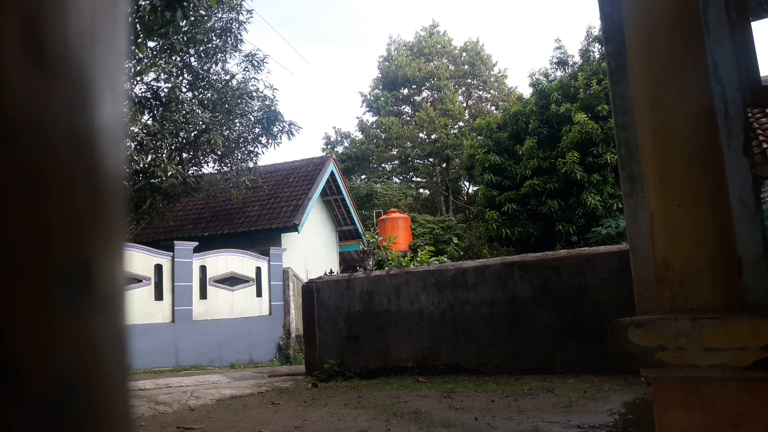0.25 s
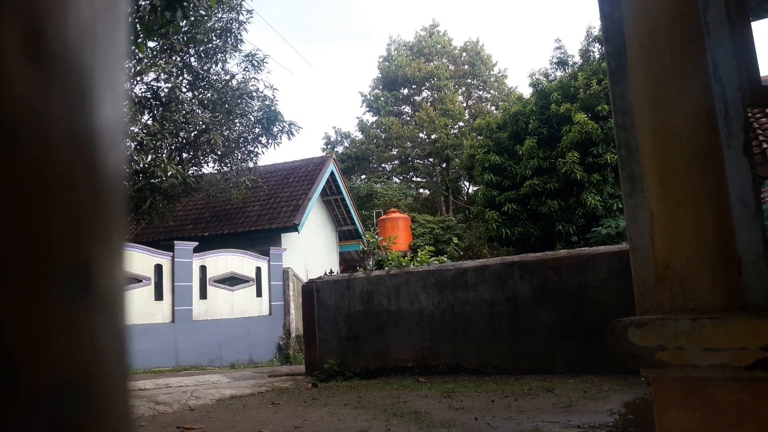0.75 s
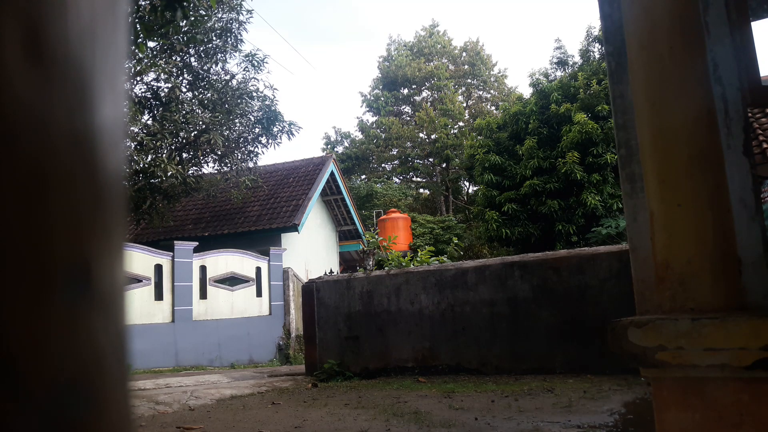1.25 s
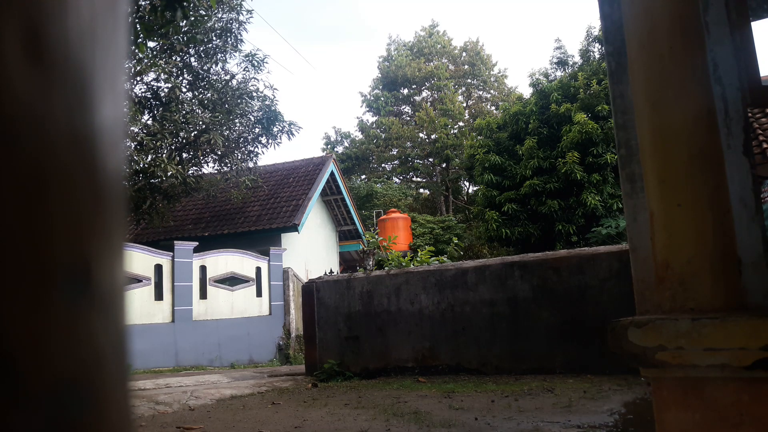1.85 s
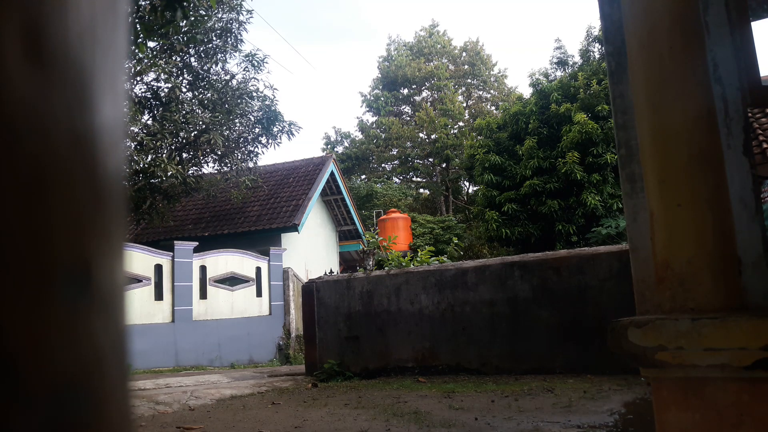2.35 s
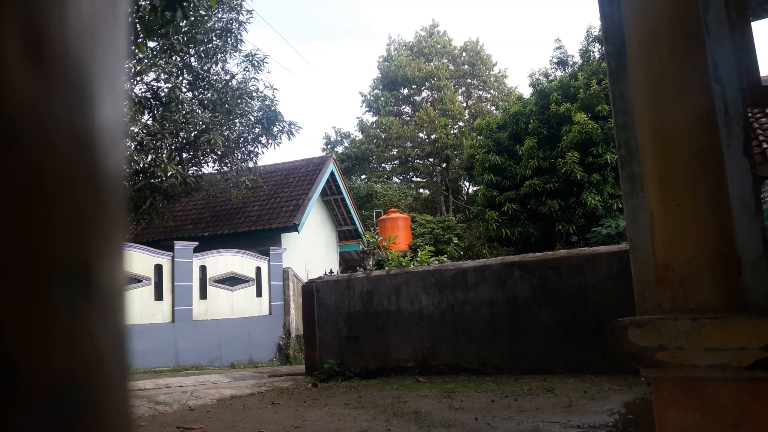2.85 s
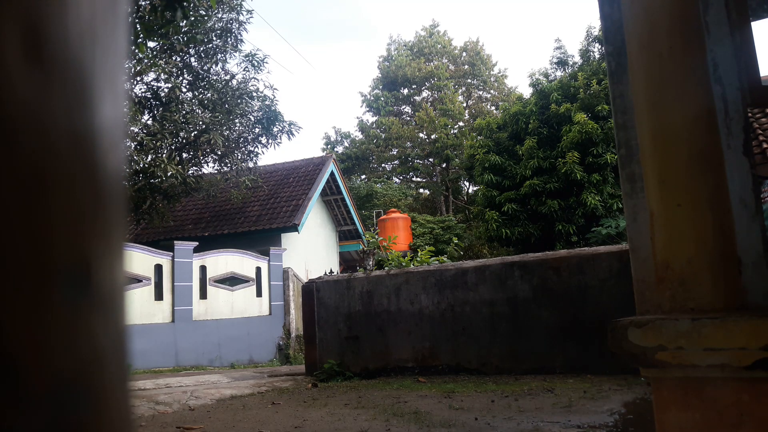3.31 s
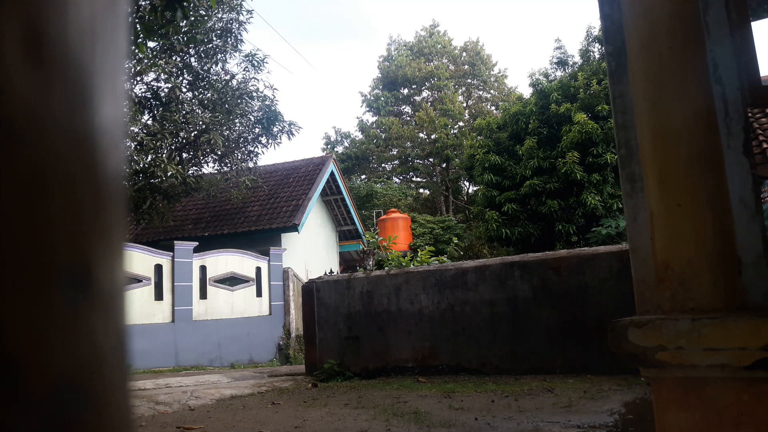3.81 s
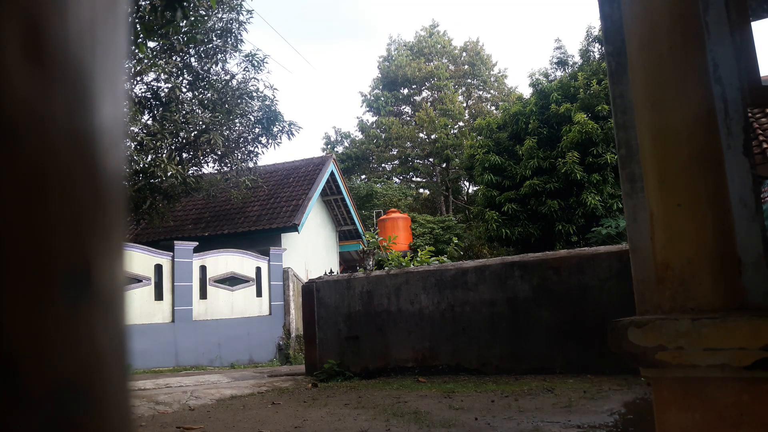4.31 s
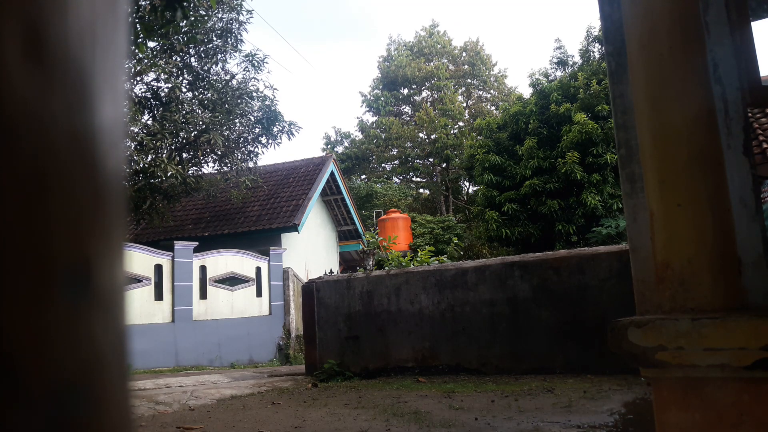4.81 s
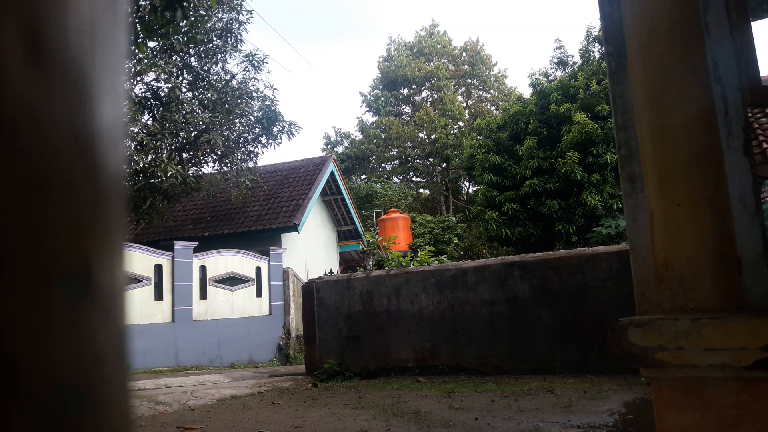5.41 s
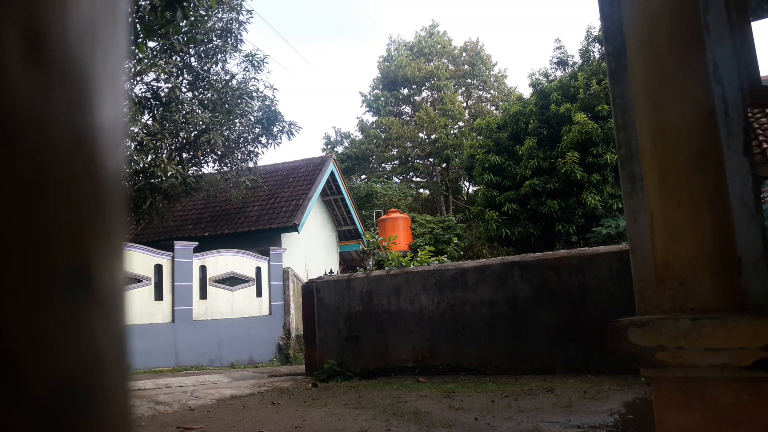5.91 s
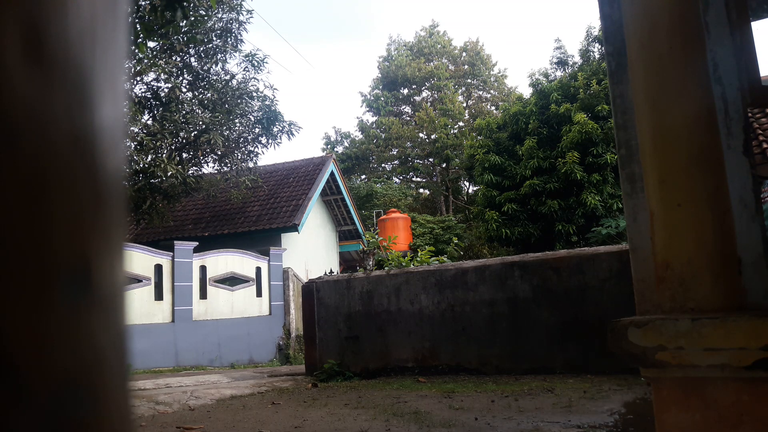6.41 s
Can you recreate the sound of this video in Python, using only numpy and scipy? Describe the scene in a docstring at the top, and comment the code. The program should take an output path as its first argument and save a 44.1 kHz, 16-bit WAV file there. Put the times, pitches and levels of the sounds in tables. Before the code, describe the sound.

Close thunder heard from a porch facing a walled yard. It starts abruptly on a heavy boom, dips, then a louder crack with a brief tearing edge hits at about 0.7 seconds. Lumpy rolls follow, another hard clap lands near 2 seconds, and scattered thuds sink into a dull low rumble. Small microphone, little deep bass, very faint hiss beneath.

```python
"""Close thunder over a yard, heard from a porch: a loud rolling clap, a second crack, then a fading rumble.
Shock waves from every kink of the lightning channel are a dense random pulse stream; strong fronts are single pulses.
Long stretches of channel land together as peals, each with its own balance of bands and a rough hollow note.
Walls throw the fronts back as sparse echoes; trees and roofs scatter the shocks into a smooth noise-like roar.
A faint steady hiss lies underneath."""
import sys
import numpy as np
from scipy import signal
from scipy.fft import rfft, irfft
from scipy.io import wavfile
from scipy.ndimage import uniform_filter1d, minimum_filter1d

SR = 44100
rng = np.random.default_rng(int(sys.argv[2]) if len(sys.argv) > 2 else 0)


def dump_mix(stems):
    """Bounce the given channels to the path in sys.argv[1] as a 16-bit WAV at rate SR."""
    frames = np.atleast_2d(stems).T  # one column per channel
    limited = np.clip(frames, -1, 1)  # hard clip at full scale
    pcm = np.round(limited * 32767).astype(np.int16)
    wavfile.write(sys.argv[1], SR, pcm)


N = 293573
TIME, BIN_HZ = np.arange(N) / SR, np.fft.rfftfreq(N, 1 / SR)

# peals, each a stretch of the channel whose shocks land together: start t/s, length before release t/s,
# base level/dB (each band of the roll and the roar has a further gain of its own), then relative to that base:
# boom level/dB, rattle level/dB, roar level/dB, hollow note level/dB; last, mean pitch of the note f/Hz
PEALS = [(-0.019, 0.11, -10, -12, -9, -27, -7.5, 244), (0.107, 0.084, -19.5, -4, -0.5, -14, -1.5, 281.2),
         (0.269, 0.028, -29, -11.5, -19.5, -31, 8.5, 252.6),
         (0.454, 0.064, -23.5, -21.5, -10, -23, 0.5, 213.2), (0.616, 0.077, -18, -9.5, -6, -23, 4, 232.6),
         (0.719, 0.19, -13.5, -13, -2.5, -22.5, -6, 253.3), (1.003, 0.14, -14.5, -8.5, -7, -23.5, -5, 281),
         (1.165, 0.074, -13, -7.5, -7, -27, -3, 170), (1.406, 0.1, -27.5, -8, -3, -38, 0, 212.6),
         (1.556, 0.055, -24.5, -12, -0.5, -22.5, -13, 503), (1.898, 0.015, -25.5, -7.5, -7, -21, -1.5, 281),
         (1.944, 0.0086, -18, -5.5, 1.5, -31, -4.5, 515), (1.953, 0.11, -18, -1.5, -8.5, -23.5, 1, 114.2),
         (2.133, 0.057, -24, -14.5, -4, -25, 0, 186.5), (2.336, 0.02, -28.5, -1, -4, -16, -2, 144),
         (2.458, 0.16, -20.5, -8, -3, -20.5, -2, 178.5), (2.634, 0.044, -22, -4.5, -11, -23.5, -1, 211.7),
         (2.896, 0.072, -32, -11, -0.5, -16, -2.5, 169), (3.146, 0.016, -21, 0, -9.5, -27, -5.5, 104),
         (3.272, 0.049, -22.5, -13, -7.5, -30.5, -6.5, 171.3),
         (3.575, 0.069, -33, -13, -6, -14, -2.5, 263.3), (3.684, 0.2, -32, -8.5, 1.5, -13.5, -13, 376),
         (4.127, 0.068, -28.5, -5.5, 0.5, -26, -6.5, 406), (4.272, 0.11, -33.5, -2.5, 0.5, -17.5, 0.5, 595),
         (4.427, 0.031, -28, 1.5, -18, -24, -5, 109.5), (4.72, 0.04, -30.5, -9, -9, -33, -1, 202),
         (4.765, 0.033, -22.5, -13, -21, -44, -6.5, 496), (4.915, 0.017, -29, -13, -3, -27, 2.5, 247.4),
         (5.143, 0.089, -29, -21, -8.5, -24, 1, 233), (5.225, 0.13, -28, -9, -10.5, -20.5, 2, 179.3),
         (5.647, 0.071, -25, -13.5, -8.5, -28.5, -1, 176.8), (5.757, 0.03, -29, -15, -4.5, -37, 1, 181.4),
         (5.846, 0.092, -30, -8, -8, -23, -10, 373), (6.153, 0.044, -35.5, -7.5, -4, -15, -6, 541),
         (6.347, 0.13, -49.5, 6.5, 5, -4.5, 10, 401), (6.545, 0.062, -28.5, -22, -6.5, -33, -19, 402)]


def gain_of(db):
    """Level definition: amplitude ratio = 10^(dB/20)."""
    return 10 ** (np.asarray(db) / 20)


def follow(rows):
    """Linear interpolation: the columns of a (t/s, values) table, sample by sample."""
    s, *columns = np.transpose(rows)
    return [np.interp(TIME, s, column) for column in columns]


def colour(x, points):
    """Linear filtering: multiplies the spectrum of x by a (f/Hz, level/dB) curve over log frequency."""
    hz, db = np.transpose(points)
    curve_db = np.interp(np.log(BIN_HZ + 1), np.log(hz), db)
    return irfft(rfft(x) * gain_of(curve_db), N)


def split(x, hz, order=12):
    """Complementary crossover: the parts of x below and above hz, which sum to x."""
    low = irfft(rfft(x) / (1 + (BIN_HZ / hz) ** order), N)
    return low, x - low


def steady(x, size):
    """RMS normalization: unit loudness over about size samples; quicker flutter stays."""
    power = uniform_filter1d(uniform_filter1d(x ** 2, size), size)
    return x / np.sqrt(abs(power) + 1e-20)


def add(mix, s, sound):
    """Superposition: mixes a sound in at time s, or at the start if s is negative."""
    part = mix[max(round(s * SR), 0):][:len(sound)]
    part += sound[:len(part)]


def thinned(x):
    """High-pass response: a small microphone misses the deepest bass."""
    return signal.sosfilt(signal.butter(6, 88, "highpass", fs=SR, output="sos"), x)


def hiss():
    """Stationary noise: the faint hiss of the still yard is filtered white noise of constant level."""
    level_db = -69
    # colour of the hiss: f/Hz, relative spectral level/dB
    spectrum = [(100, -3.5), (2000, -2.5), (3800, -5.5), (4800, -9.5), (7000, -10), (7900, -22),
                (15000, -17)]
    noise = colour(rng.standard_normal(N), spectrum)
    return gain_of(level_db) * noise / noise.std()


def shocks(per_s, spread_db, blur_db):
    """Shot noise: random arrivals from the channel's kinks, many small, few large, in a blur of their echoes."""
    # colour of the thunder, ahead of any band normalization: f/Hz, relative spectral level/dB
    spectrum = [(20, -41), (52, -27), (62, -12.5), (96, -9.5), (112, 3), (124, -6), (150, 2), (195, 2.5),
                (258, -1.5), (300, -3), (370, -3.5), (520, -7.5), (720, -13.5), (1000, -21.5), (1450, -32),
                (2000, -44), (4100, -66), (7200, -69), (7900, -95)]
    sizes = gain_of(spread_db * np.minimum(rng.exponential(1, N), 4))
    arrives = rng.random(N) < per_s / SR
    train = sizes * rng.choice([-1, 1], N) * arrives
    blur = gain_of(blur_db) * rng.standard_normal(N)
    return colour(train / train.std() + blur, spectrum)


def peal(t, length):
    """Envelope shaping: amplitude of one peal at times t after its start: attack, sagging hold, release."""
    attack_s, sag_db_per_s, release_db_per_s = 0.0056, 9.5, 95
    t = np.maximum(t, 0)
    loss_db = sag_db_per_s * t + release_db_per_s * np.maximum(t - length, 0)
    return np.minimum(t / attack_s, 1) * gain_of(-loss_db)


def loudness():
    """Incoherent summation: peals add their power to the long rumble, in boom, body, rattle and roar."""
    # the long rumble between the peals: t/s, body level/dB, roar level/dB (ahead of each band's own gain)
    rumble = [(0.0, -23.5, -38.5), (0.8, -22.5, -35.5), (0.98, -26, -39.5), (1.35, -26.5, -42),
              (1.8, -34.5, -51), (2.3, -28.5, -46.5), (2.82, -32, -49.5), (3.1, -29, -45),
              (3.45, -27.5, -44.5), (3.85, -30.5, -51), (4.02, -32, -48), (4.35, -30.5, -48),
              (4.7, -32.5, -52.5), (5.05, -32.5, -50), (5.5, -35, -54.5), (6.66, -37, -54.5)]
    boom_weight_db, rattle_weight_db = -9, -2  # relative to the body of the rumble
    rumble_db, rumble_roar_db = follow(rumble)
    power = gain_of([rumble_db + boom_weight_db, rumble_db, rumble_db + rattle_weight_db, rumble_roar_db]) ** 2
    for start, length, level_db, boom_db, rattle_db, roar_db, _, _ in PEALS:
        weights = gain_of(level_db + np.array([boom_db, 0, rattle_db, roar_db]))
        power += np.outer(weights, peal(TIME - start, length)) ** 2
    return np.sqrt(power)


def scatter(roar_gain):
    """Diffuse scattering and air absorption: countless weak echoes blur into a roar; later ones are duller."""
    absorbed_db_per_s = 0.72  # extra loss of the bright part
    _, roar = split(shocks(per_s=820, spread_db=3.5, blur_db=2.5), 776)
    dull, bright = split(steady(roar, size=3000), 1750, order=8)
    bright_gain = gain_of(5.5 - absorbed_db_per_s * TIME)
    return gain_of(1.5) * roar_gain * (dull + bright_gain * bright)


def flutter(t, hz):
    """Narrow-band random process: complex motion of unit RMS, with changes up to about hz a second."""
    white = rng.standard_normal(len(t)) + 1j * rng.standard_normal(len(t))
    gaussian = np.exp(-.5 * (np.fft.fftfreq(len(t), 1 / SR) / hz) ** 2)
    z = np.fft.ifft(np.fft.fft(white) * gaussian)
    return z / np.sqrt(np.mean(abs(z) ** 2))


def notes():
    """Repetition pitch: roughly even kinks give each peal a rough, drifting hollow note of narrow-band noise."""
    width, wander, wander_hz = 0.065, .05, 5.2  # width and drift as shares of the pitch; rate of the drift
    out, t = np.zeros(N), TIME[:2 ** 15]
    for start, length, level_db, _, _, _, note_db, hz in PEALS:
        pitch_hz = hz * (1 + wander * flutter(t, wander_hz).real)
        turns = np.cumsum(pitch_hz) / SR
        z = flutter(t, width * hz)
        softened = z / np.sqrt(abs(z))  # the square root evens out the swells
        wave = np.sqrt(2) * (softened * np.exp(2j * np.pi * turns)).real
        add(out, start, gain_of(level_db + note_db) * peal(t, length) * wave)
    return out


def cracks():
    """Little air absorption: the nearest fronts keep a sharp edge, a short tearing burst of tiny shocks."""
    # the tearing edges: t/s, level/dB, decay to 1/e t/ms
    edges = [(0.727, -27, 30), (0.768, -33, 21.3), (0.819, -29, 14), (1.187, -32, 47), (1.572, -40, 12),
             (1.952, -24, 3.6), (1.957, -39, 39), (2.053, -38, 23), (2.157, -41.5, 21), (2.343, -36.5, 4.6),
             (2.469, -34, 6.9), (2.54, -36, 21), (3.16, -32.5, 8.2)]
    # colour of the edges: f/Hz, relative spectral level/dB
    spectrum = [(500, -15.5), (850, 14.5), (1150, 11), (1800, -0.5), (2800, -11.5), (3800, -27),
                (4800, -44.5), (8000, -68.5)]
    attack_s = 0.0012
    out, t = np.zeros(N), TIME[:SR // 8]
    for s, db, decay_ms in edges:
        envelope = np.minimum(t / attack_s, 1) * np.exp(-t * 1000 / decay_ms)
        add(out, s, gain_of(db) * envelope * rng.choice([-1, 1], len(t)))
    unit = colour(rng.standard_normal(N), spectrum).std()  # loudness of white noise in this colour
    return colour(out, spectrum) / unit


def roll(boom_gain, body_gain, rattle_gain):
    """Band decomposition: in one stream of shocks long waves boom, short ones rattle, and their shares shift."""
    deep, rest = split(shocks(per_s=480, spread_db=1.0, blur_db=1.0), 83)
    boom, rest = split(rest, 141.2)
    body, rest = split(rest, 310.0)
    rattle, _ = split(rest, 870)
    deep_gain = body_gain ** 0.75  # the longest waves follow the body, but swell and fade less
    return (gain_of(-26) * deep_gain * steady(deep, size=6000)
            + gain_of(0.8) * boom_gain * steady(boom, size=2600)
            + gain_of(-3.0) * body_gain * steady(body, size=2000)
            + gain_of(-1.5) * rattle_gain * steady(rattle, size=2200))


def yard(x, tail_db, t60, count=6):
    """Reflection as convolution: a front, trailing shocks and wall slaps, and a short diffuse tail."""
    echo_db, echo_span_s = -9.5, .04  # level before a fall with lateness; latest arrival
    t = TIME[:SR // 2]
    decay = np.exp(-np.log(1000) * t / t60)
    tail = rng.standard_normal(len(t)) * (1 - np.exp(-t / 0.011)) * decay
    response = gain_of(tail_db) * tail / np.linalg.norm(tail)
    response[0] += 1  # the direct front
    arrivals = ((np.arange(count) + 1 + rng.random(count)) / (count + 1)) ** 2  # as shares of the span
    for lateness in arrivals:
        echo = rng.choice([-1, 1]) * gain_of([echo_db - 12 * lateness])
        add(response, lateness * echo_span_s, echo)
    return signal.fftconvolve(x, response)


def claps():
    """Shock waves: a pressure jump and a longer suction, rounded off by the air; strong fronts are longer."""
    # single strong fronts: t/s, peak level/dB ahead of echoes and high-pass, treble limit left by the air f/Hz
    fronts = [(0.009, -6, 382), (0.043, -15, 624), (0.114, -12.5, 760), (0.33, -28, 524),
              (0.608, -17.5, 765), (0.728, -1.5, 873), (0.767, -6.5, 797), (0.819, -17, 785),
              (0.833, -6, 500), (0.87, -17, 703), (1.04, -6.5, 550), (1.06, -14.5, 720), (1.101, -7.5, 600),
              (1.188, -12.5, 598), (1.568, -17, 860), (1.95, -3.5, 800), (1.956, -10, 450),
              (1.985, -7.5, 446), (2.001, -9, 380), (2.033, -6, 620), (2.065, -9, 700), (2.154, -13, 855),
              (2.177, -17.5, 790), (2.342, -14, 700), (2.466, -18, 550), (2.557, -15, 700),
              (3.074, -29, 694), (3.158, -13.5, 604), (3.28, -9, 655), (3.309, -21.5, 610),
              (3.451, -16.5, 850), (3.591, -18, 664), (3.749, -19, 560), (3.79, -19, 480),
              (4.161, -17.5, 680), (4.281, -12, 600), (4.332, -13.5, 660), (4.444, -17.5, 530),
              (4.644, -26, 590), (4.767, -17.5, 590), (4.812, -23, 586), (4.846, -23, 607),
              (4.916, -22, 560), (4.944, -22, 580), (4.991, -22, 566), (5.144, -21, 563), (5.174, -20, 577),
              (5.23, -16, 583), (5.312, -18, 570), (5.664, -20.5, 455), (5.775, -19.5, 444),
              (6.014, -21, 560), (6.534, -30, 506)]
    full_scale_ms, growth = 1.17, 0.55  # time to the pressure's zero crossing at 0 dB; exponent of the strength
    out = np.zeros(N)
    for s, db, air_hz in fronts:
        length_ms = full_scale_ms * gain_of(db) ** growth
        u = TIME[:4096] * 1000 / length_ms
        # the steep treble limit (1 dB ripple) lets each front ring for a few cycles
        air = signal.cheby1(4, 1, air_hz, fs=SR, output="sos")
        front = signal.sosfilt(air, (1 - u) * np.exp(-u))
        add(out, s, yard(gain_of(db) * front / abs(front).max(), tail_db=-11.5, t60=0.17))
    return out


def scene():
    """Superposition: roll, hollow notes, claps, scattered roar and cracks over the quiet yard."""
    boom, body, rattle, roar = loudness()
    thunder = roll(boom, body, rattle) + thinned(notes() + claps()) + scatter(roar) + cracks()
    return (thunder + hiss())[None]


def record(dry):
    """Peak limiting and band limiting: smoothed gain holds the tallest peaks, then a low-pass cuts the treble."""
    ceiling, edge_hz = .93, 15700
    allowed = ceiling / np.maximum(abs(dry), ceiling)
    lowest = minimum_filter1d(allowed, size=601)
    gain = uniform_filter1d(uniform_filter1d(lowest, size=301), size=301)
    low_pass = signal.firwin(511, edge_hz, window=("kaiser", 9), fs=SR)
    return signal.oaconvolve(dry * gain, low_pass[None], "same")


dry = scene()
out = record(dry)
dump_mix(out)
```